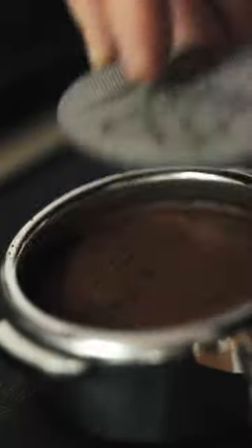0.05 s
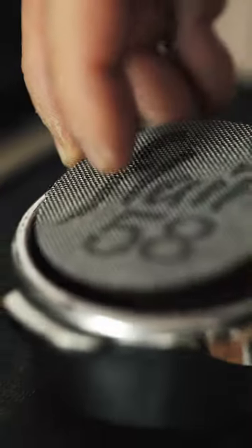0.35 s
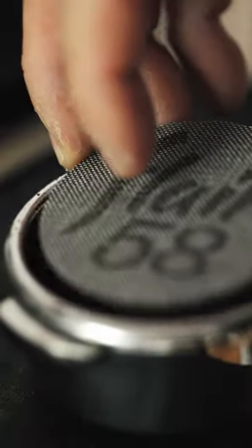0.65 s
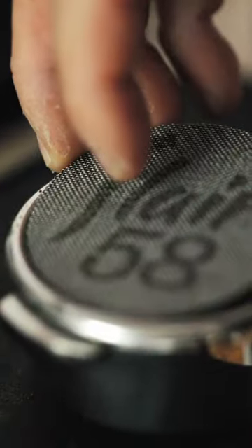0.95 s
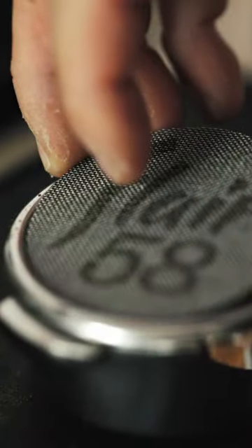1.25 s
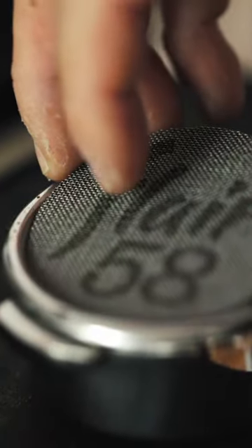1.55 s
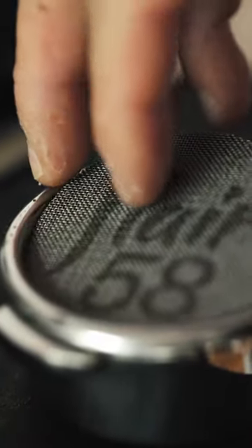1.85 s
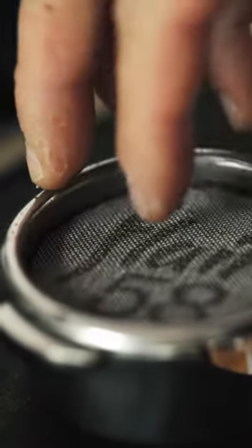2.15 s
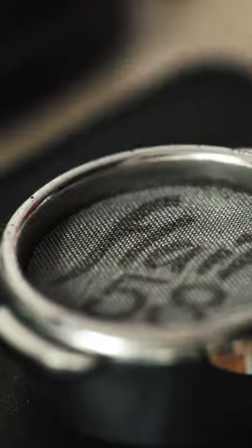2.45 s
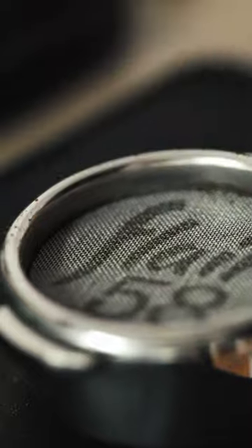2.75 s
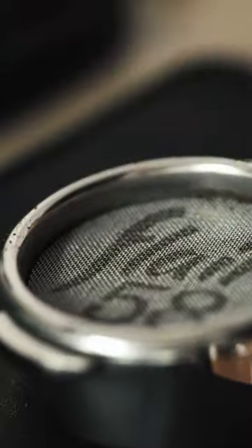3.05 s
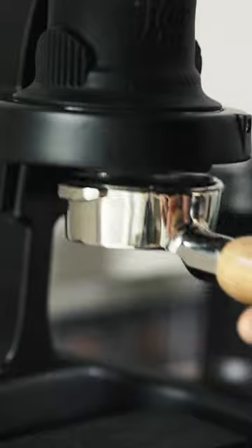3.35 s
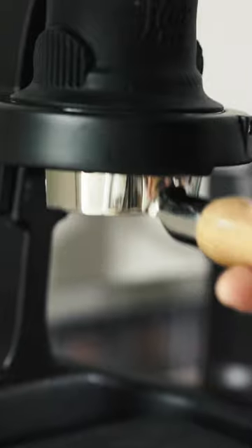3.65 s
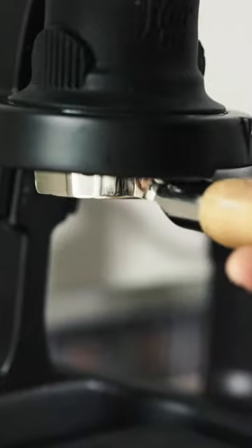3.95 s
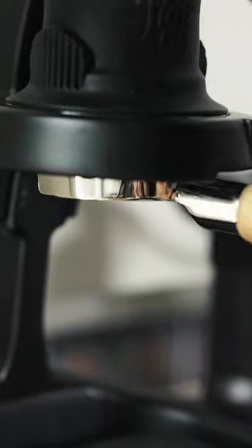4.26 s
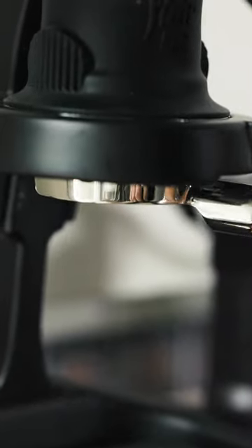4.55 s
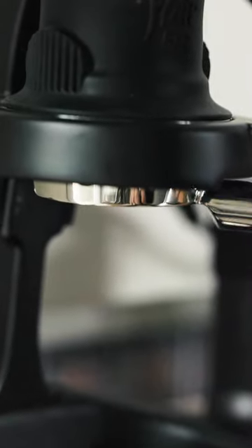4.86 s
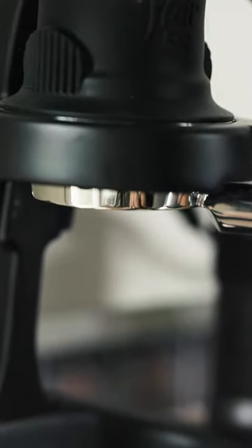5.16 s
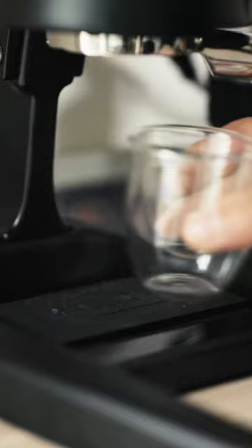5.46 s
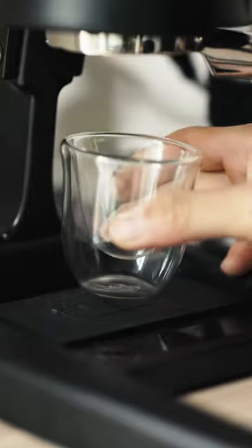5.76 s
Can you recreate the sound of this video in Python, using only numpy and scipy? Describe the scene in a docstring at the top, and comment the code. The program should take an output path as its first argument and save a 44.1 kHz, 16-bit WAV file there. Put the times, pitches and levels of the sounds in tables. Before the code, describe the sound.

Steady rain outside, with soft taps indoors, then a steel coffee filter holder clinking into an espresso maker and squeaking tight.

```python
"""An even wash, like rain outside a window, runs from start to end, almost in mono.
First, fingertips scuff faintly and a mesh screen is pressed into a steel coffee filter holder with
dull taps. At about 3.5 seconds the holder clinks into the espresso maker, and both steel parts ring.
From 4 seconds it is twisted tight: its lugs (small tabs) stick and slip, squeaking twice, and it
clicks home. A small room echoes the steel and the scuffs."""
import sys
import numpy as np
from scipy import signal
from scipy.fft import rfft, irfft, next_fast_len
from scipy.io import wavfile
from scipy.ndimage import map_coordinates

SR = 44100
rng = np.random.default_rng(int(sys.argv[2]) if len(sys.argv) > 2 else 0)


def wrap_up_sound(samples):
    """Save the sound to the file named by the first command line argument, as 16-bit audio."""
    columns = np.atleast_2d(samples).T
    # keep every value between -1 and 1, then stretch to whole-number steps
    tamed = np.clip(columns, -1, 1)
    steps = np.round(tamed * 32767).astype(np.int16)
    wavfile.write(sys.argv[1], SR, steps)


N = 259749


def amp(db):
    """Turn decibels (dB) into a number to multiply a sound by."""
    return 10 ** (np.asarray(db) / 20)


def unit(x):
    """Scale a sound to an average strength (rms) of 1."""
    return x / np.sqrt(np.mean(x ** 2) + 1e-20)


def along(points, hz):
    """Read a curve drawn through (Hz, value) points, with octaves evenly spaced."""
    point_hz, values = np.transpose(points)
    return np.interp(np.log(hz + 1), np.log(point_hz + 1), values)


def wobble(rate, n=N):
    """A smooth random curve of n samples that picks a new value rate times a second."""
    return map_coordinates(rng.standard_normal(int(n * rate / SR) + 4), [np.arange(n) * rate / SR])


def filtered(x, response):
    """Turn each frequency of a sound up or down by response(hz)."""
    n = x.shape[-1]
    padded = next_fast_len(n + SR // 4)
    return irfft(rfft(x, padded) * response(np.fft.rfftfreq(padded, 1 / SR)), padded)[..., :n]


def tilt(hz, db_per_octave):
    """A harder contact lifts the treble: the change in dB, pivoting at 2500 Hz."""
    return db_per_octave * np.log2(np.maximum(hz, 1000) / 2500)


def noise(spectrum, n, tilt_db=0):
    """Noise of strength 1, shaped by a table of frequencies and levels."""
    return unit(filtered(rng.standard_normal(n), lambda hz: amp(along(spectrum, hz) + tilt(hz, tilt_db))))


def fade(t, t60):
    """Die away by 60 dB in t60 seconds, the fade time."""
    return np.exp(-np.log(1000) * t / t60)


def envelope(t, start, end, rise_db_per_s, fall_db_per_s):
    """A volume curve that swells up to start, holds until end and dies away."""
    return amp(-rise_db_per_s * np.maximum(start - t, 0) - fall_db_per_s * np.maximum(t - end, 0))


def add(track, start, sound):
    """Mix a sound into a track at start seconds."""
    part = track[round(start * SR):][:len(sound)]
    part += sound[:len(part)]


def background(wash_db=-54.5, drift_db=0.22):
    """An even wash from outside over the faint, wavering drone of an appliance."""
    # Each row: frequency in Hz, relative level in dB.
    wash_spectrum = [(15, -37), (25, -26), (45, -4.5), (75, -2), (100, -4), (125, 2.5), (165, -3.5),
                     (300, -4.5), (500, -9), (900, -8), (2000, -12), (3500, -12.5), (4800, -23.5),
                     (8000, -30), (16000, -37)]
    # Each row: pitch in Hz, level in dB.
    hum_tones = [(125, -84)]
    wash = amp(wash_db + drift_db * wobble(2.95)) * noise(wash_spectrum, N)
    drone = sum(amp(db + 1.8 * wobble(4)) * np.sin(2 * np.pi * np.cumsum(hz + 4 * wobble(36)) / SR)
                for hz, db in hum_tones)
    return wash + drone


def patter(level_db=-73, size_spread_db=4, drops_per_s=25):
    """Single drops fall at random and barely stand out of the wash."""
    # The tone of a drop. Each row: frequency in Hz, relative level in dB.
    drop_spectrum = [(400, -30), (900, -11), (3600, 7), (5000, -4.5), (12000, -20)]
    falls = rng.random(N) < drops_per_s / SR
    sizes = amp(size_spread_db * np.clip(rng.standard_normal(N), -2, 2))
    return amp(level_db) * unit(filtered(falls * sizes, lambda hz: amp(along(drop_spectrum, hz))))


def room(x, build_s=0.017):
    """The echo from the walls builds up briefly, then each frequency dies at its own speed."""
    # Each row: frequency in Hz, fade time in seconds.
    echo_times = [(100, 1), (1400, 0.78), (4000, 0.61), (7000, 0.61), (14000, 0.17)]
    hz, t, bands = signal.stft(rng.standard_normal(SR), SR, nperseg=256)
    bands = bands * fade(t, along(echo_times, hz)[:, None]) * (1 - np.exp(-t / build_s))
    tail = signal.istft(bands, SR, nperseg=256)[1]
    return signal.fftconvolve(x, tail / np.linalg.norm(tail))[:N]


def finger_shifts(count, start_s=0.06, end_s=0.38, length_s=0.013, tilt_db=-3):
    """Extra rows for scuffs(): the fingers shift at random while they carry the screen."""
    chance = rng.random((count, 2))
    times = start_s + (end_s - start_s) * (np.arange(count) + chance[:, 0]) / count
    levels_db = -54.5 + 1.5 * (2 * chance[:, 1] - 1)
    return [(start, db, length_s, tilt_db) for start, db in zip(times, levels_db)]


def scuffs():
    """Fingertips brush mesh and metal, making brief, grainy puffs of noise; the last, faint one at 5.6 s is a
    cup set down."""
    # Each row: start in seconds, level in dB, length in seconds, treble tilt in dB per octave.
    brushes = [(0.338, -54, 0.0048, -2), (0.74, -44, 0.0023, -4), (0.846, -50, 0.0011, -2),
               (1.722, -54.5, 0.014, 0.5), (2.105, -49.5, 0.011, -1), (2.1687, -46, 0.0054, 4),
               (2.859, -52.5, 0.0061, -4), (3.091, -59, 0.046, -3.5), (3.468, -52.5, 0.044, -10),
               (4.087, -47, 0.0097, 1), (5.635, -59.5, 0.05, -2)]
    # Each row: frequency in Hz, relative level in dB.
    mesh_spectrum = [(500, -2.5), (1500, 6.5), (3600, 2.5), (7000, -4.5), (11000, -15), (16000, -32)]
    out, t = np.zeros(N), np.arange(SR // 4) / SR
    for start, db, length, tilt_db in brushes + finger_shifts(count=4):
        age = 2 * t / length  # the puff peaks at age 1
        grain = unit(amp(3.5 * wobble(770, len(t))))
        add(out, start, amp(db) * age * np.exp(1 - age) * grain * noise(mesh_spectrum, len(t), tilt_db))
    return out


def taps():
    """Soft knocks on the filter basket; the packed coffee stops its ringing quickly."""
    # Each row: start in seconds, relative level in dB, pitch multiplier, contact time in seconds.
    knocks = [(0.4292, -17.5, 0.87, 0.0053), (0.7544, -11, 0.91, 0.00068), (2.176, -38.5, 0.72, 0.00052),
              (2.232, -39, 0.39, 0.0009), (2.863, -37.5, 0.88, 0.00093)]
    # Each row: pitch in Hz, relative level in dB, fade time in seconds.
    basket_tones = [(75, -29, 0.089), (224, -21, 0.055), (448, -23, 0.035), (753, -23, 0.032),
                    (900, 3.5, 0.01), (1100, 0, 0.008), (2030, -13, 0.012)]
    out, t = np.zeros(N), np.arange(SR // 4) / SR
    for start, db, pitch, contact in knocks:
        knock = sum(amp(level) * fade(t, t60) * np.sin(2 * np.pi * hz * pitch * t)
                    for hz, level, t60 in basket_tones)
        add(out, start, amp(db - 1.0) * knock * (1 - np.exp(-t / contact)))
    # soft contact leaves out the treble, and so small a body gives off no deep bass
    return filtered(out, lambda hz: 1j * hz / (60 + 1j * hz) / (1 + 1j * hz / 4000))


def grind(turn_db=-65, bind_db=-53, grain_db=4):
    """Tiny slips of the turning lugs keep the metal ringing, most of all when they bind mid-turn."""
    # Where the clamped steel and stand ring. Each row: pitch in Hz, width in Hz, relative level in dB.
    resonances = [(238, 15.3, 5.5), (320, 21, 2.5), (1373, 14, 13), (2320, 22, 4), (2470, 100, -2),
                  (3280, 100, -4)]

    def body(hz):
        peaks = sum(amp(db) * 1j * hz * width / (pitch * pitch - hz * hz + 1j * hz * width)
                    for pitch, width, db in resonances)
        return peaks / (1 + 1j * hz / 5000)  # soften the treble

    t = np.arange(N) / SR
    press_db_per_s, ease_db_per_s = 172, 170
    turning = amp(turn_db) * envelope(t, 4.02, 4.57, press_db_per_s, ease_db_per_s)
    binding = amp(bind_db) * envelope(t, 4.18, 4.325, press_db_per_s, ease_db_per_s)
    slips = rng.standard_normal(N) * amp(grain_db * wobble(300))
    return (turning + binding) * unit(filtered(slips, body))


def squeaks(swell_db=17, release_db_per_s=1100, flutter_db=1.6, shrill_above_hz=2000):
    """Steel sticks and slips on steel: each slip swells, holds and lets go while its pitch bends."""
    # Each row: start, rise and hold in seconds, level in dB, pitch in Hz, then three fractions:
    # pitch sag (negative rises), pitch arch and rasp (roughness).
    slips = [(4.016, 0.0134, .035, -53.5, 2950, .06, 0.00092, .3),
             (4.052, 0.0306, .007, -40.5, 2804, 0.077, 0.0186, .27),
             (4.095, 0.0137, 0.0119, -36.5, 2540, -0.113, 0.022, 0.39),
             (4.116, 0.0157, 0.0088, -33, 2660, 0.036, 0.025, 0.26),
             (4.144, 0.0067, 0.018, -44.5, 2407, 0.032, 0.0039, 0.437),
             (4.158, .008, 0.025, -49, 1372, 0.036, 0, 0.24),
             (4.222, 0.042, 0.0384, -37.5, 1392, 0.015, .002, 0.19)]
    # The tones in a high and a low squeak. Each row: multiple of the pitch, relative level in dB.
    high_partials = [(1, 4.5), (2, -14), (3, -23), (4, -34), (5, -44)]
    low_partials = [(1, 0), (2, -12), (3, -12), (4, -32), (5, -35)]
    out, t = np.zeros(N), np.arange(SR // 4) / SR
    chance = lambda rate: wobble(rate, len(t))
    for start, rise, hold, db, pitch, sag, arch, rasp in slips:
        from_middle = np.minimum(t / (rise + hold), 1.2) - 0.5
        hz = pitch * (1 - sag * from_middle - arch * (2 * from_middle) ** 2)
        jitter = 0.06 * rasp * (chance(250) + chance(1300))
        phase = 2 * np.pi * np.cumsum(hz * (1 + jitter)) / SR
        partials = high_partials if pitch > shrill_above_hz else low_partials
        # each tone flutters at random, as if crossing the metal's resonances
        tone = unit(sum(amp(level + flutter_db * np.sqrt(k) * chance(160)) * np.sin(k * phase)
                        for k, level in partials))
        gain = envelope(t, rise, rise + hold, swell_db / rise, release_db_per_s)
        add(out, start, amp(db) * gain * tone * (1 + rasp * chance(1200)))
    return out


def thud(t):
    """The machine's stand takes a blow with a short, low shudder."""
    # Each row: pitch in Hz, relative level in dB, fade time in seconds.
    stand_tones = [(73.6, -18.5, .35), (129, -16.5, 0.16), (236.5, -11.5, 0.12), (322, -7.5, 0.067),
                   (587, -4.5, 0.055), (800, -12, 0.022)]
    return sum(amp(db) * fade(t, t60) * np.sin(2 * np.pi * hz * t) * rng.choice([-1, 1])
               for hz, db, t60 in stand_tones)


def ring(tones, t, tilt_db, scatter_db=3.5):
    """Struck steel rings; each tone's strength and sign vary at random, as with the spot that is hit."""
    hz, db, t60 = np.transpose(tones)[:, :, None]
    strength = amp(db + tilt(hz, tilt_db) + scatter_db * rng.standard_normal(hz.shape))
    sign = rng.choice([-1, 1], hz.shape)
    return np.sum(sign * strength * fade(t, t60) * np.sin(2 * np.pi * hz * t), axis=0)


def clinks(ring_db=-8, clash_db=-1, crack_db=-5, shimmer_db=-23):
    """The holder hits the head (the machine's socket): a crack, a clash, a longer ring and a thud."""
    # Each row: start in seconds, overall level in dB, treble tilt in dB per octave,
    # then the relative levels of the thud and of the head's ring in dB.
    contacts = [(3.541, -20.5, -1, -22, -26), (3.5467, -25.5, -5.5, -7.5, -18),
                (3.631, -33.5, 3.5, -15, -19), (3.638, -29.5, -3, -5.5, -15), (3.797, -17, 3, -19, 2.5),
                (3.809, -22.5, -.5, -12.5, 2), (3.8433, -29.5, -1.5, -12.5, 2.5), (4.155, -36, 1, -7, -1),
                (4.306, -36.5, -3.5, -9, 2), (4.4511, -35, -2, -17, -8.5)]
    # How the two parts ring. Each row: pitch in Hz, relative level in dB, fade time in seconds.
    holder_tones = [(1101, -7.5, 0.15), (1082, -13.5, 0.11), (1357, -1, 0.059), (1400, -1, 0.13),
                    (1320, -27, 0.51), (1880, -19, .09), (2445, -9, 0.1), (2540, -6.5, 0.068),
                    (2670, -10, 0.061), (3340, 3, 0.028), (3504, -3, 0.056), (3780, -3, 0.026),
                    (4240, -27, 0.087), (5000, -12, 0.054), (8640, -17, 0.064), (11700, -18, 0.04)]
    head_tones = [(1842, -3, 0.29), (1970, -13, 0.18), (2554, -5.5, 0.075), (3140, -7, 0.062),
                  (3550, -15, 0.086), (3700, -26, .2), (4300, -23, .2), (4780, -12.5, 0.11),
                  (6030, -9, 0.087), (6750, -9.5, 0.054), (7540, -25, .15), (10000, -35, 0.11)]
    # Tones so crowded that they blur into noise: the short clash and the head's high shimmer.
    # Each row: frequency in Hz, relative level in dB.
    clash_spectrum = [(400, -29), (700, -7), (950, -9.5), (1300, 5), (2100, -4.5), (3400, 2), (4600, 0),
                      (6300, -8.5), (8200, -14.5), (12000, -21.5), (16000, -29)]
    shimmer_spectrum = [(900, -10), (1700, 3), (2500, 2), (3400, -8), (4600, 1), (6100, -5), (7200, -20),
                        (8600, -22), (9800, -27), (14000, -32)]
    out, t = np.zeros(N), np.arange(SR) / SR
    for start, db, tilt_db, thud_db, head_db in contacts:
        steel = ring(holder_tones, t, tilt_db) + amp(head_db) * ring(head_tones, t, tilt_db)
        # the hand and the pressed faces soon choke most of the ring
        grip = amp(-13.0) + (1 - amp(-23.5)) * fade(t, 0.098)
        shimmer = amp(shimmer_db + head_db) * noise(shimmer_spectrum, len(t)) * fade(t, 0.41)
        clash = amp(clash_db) * noise(clash_spectrum, len(t), tilt_db) * fade(t, 0.036)
        crack = amp(crack_db) * noise(clash_spectrum, len(t), tilt_db + 5.5) * fade(t, 0.0068)
        stand = amp(thud_db) * thud(t)
        onset = 1 - np.exp(-t / 0.00028)
        clink = amp(ring_db) * steel * grip + shimmer + clash + crack + stand
        add(out, start, amp(db) * onset * clink)
    return out


def scene():
    """Everything sits in the centre; only the background has a little width."""
    # Each row: frequency in Hz, level of the sides compared with the centre in dB.
    stereo_width = [(25, -2), (70, -21), (250, -26), (500, -21.5), (1000, -40), (3000, -48), (5500, -7.5),
                    (8000, -8.5), (12000, -1.5), (14000, -23)]
    steel, screen, hand = clinks(), taps(), scuffs()
    twist = squeaks() + grind()
    to_walls = amp(-15.0) * steel + amp(-18.5) * twist + amp(-22) * hand
    mid = steel + twist + screen + hand + background() + patter() + room(to_walls)
    side = filtered(background(), lambda hz: amp(along(stereo_width, hz)))
    return np.array([mid + side, mid - side])


def record(dry):
    """Cut off the very highest treble."""
    top_hz = 15750
    return filtered(dry, lambda hz: 1 / np.sqrt(1 + (hz / top_hz) ** 120))


dry = scene()
out = record(dry)
wrap_up_sound(out)
```